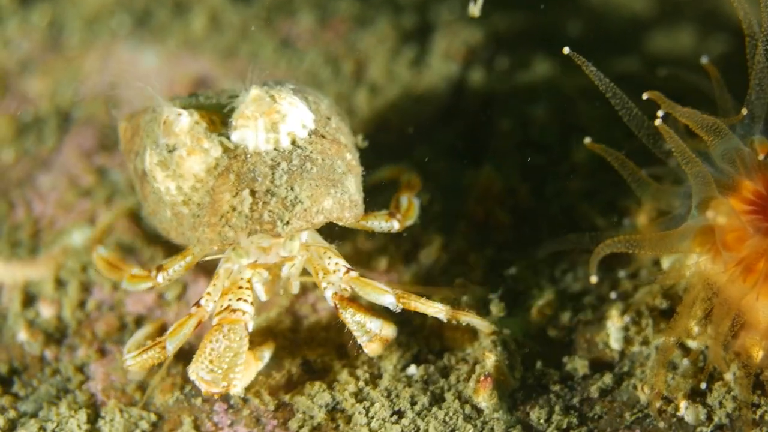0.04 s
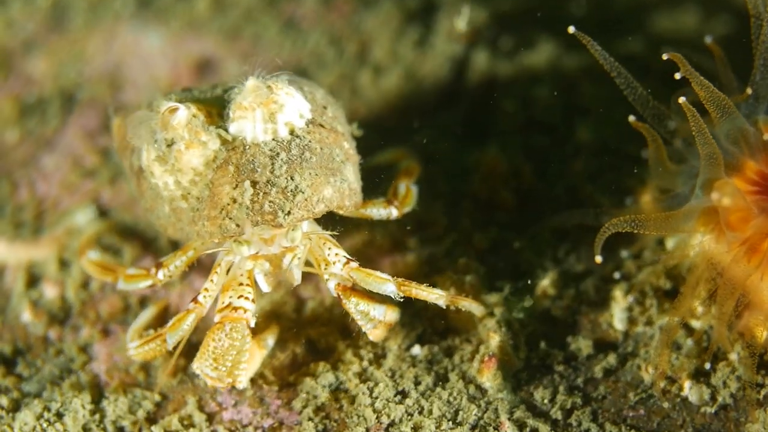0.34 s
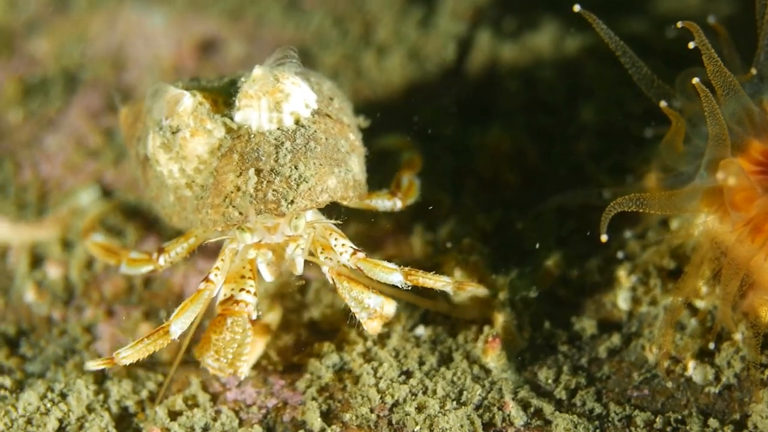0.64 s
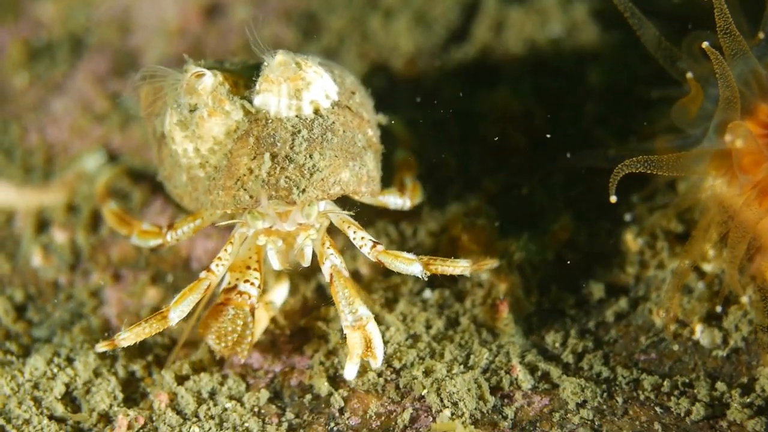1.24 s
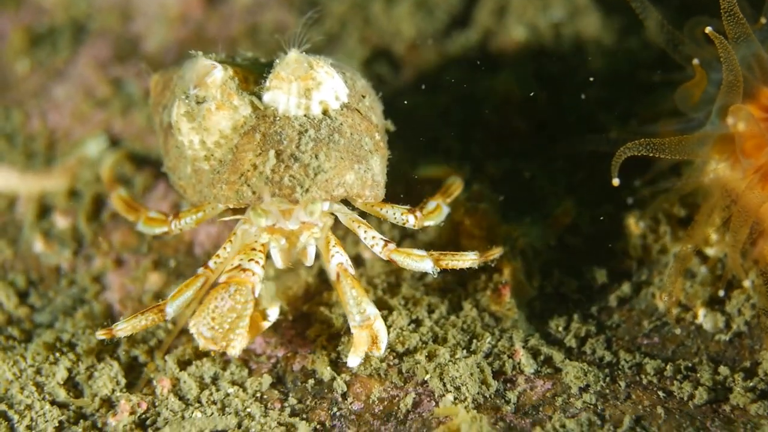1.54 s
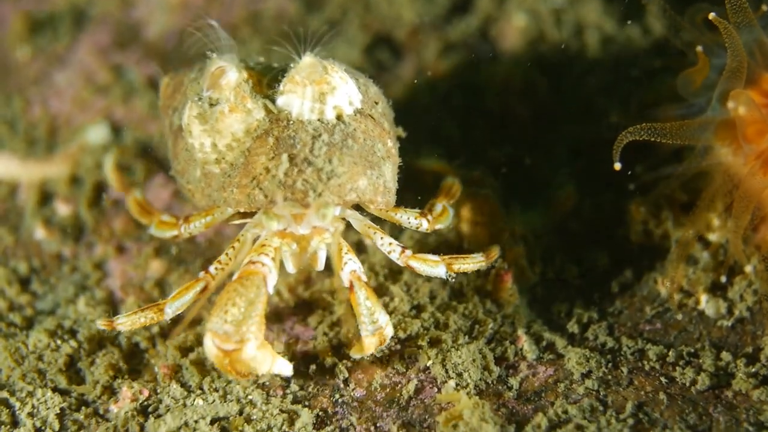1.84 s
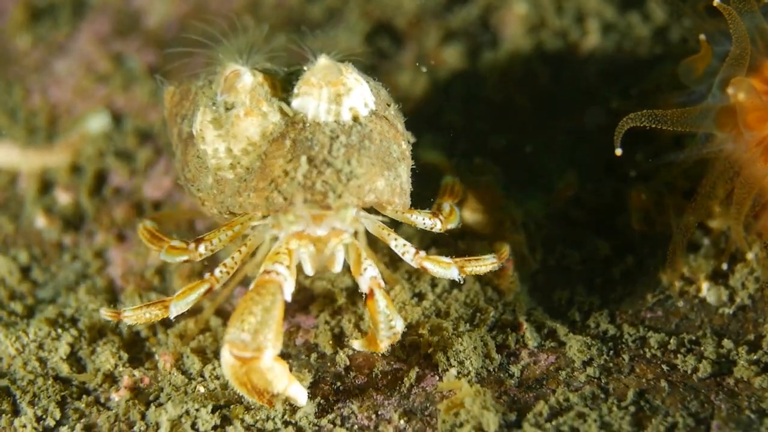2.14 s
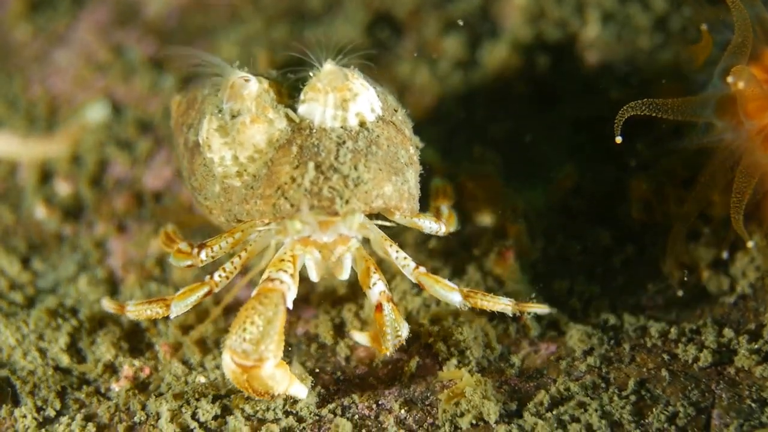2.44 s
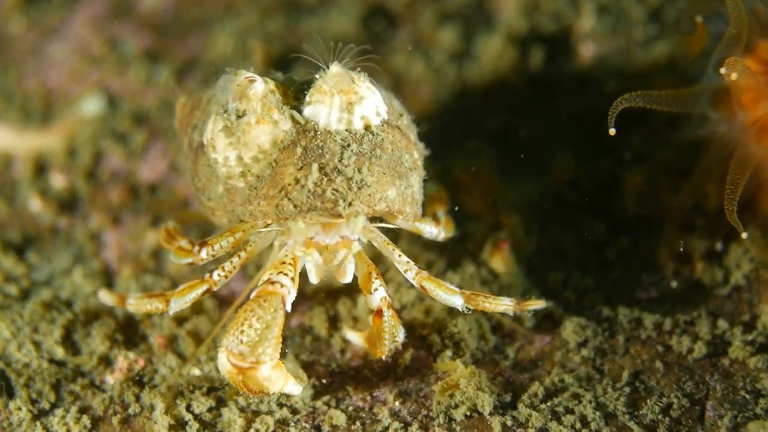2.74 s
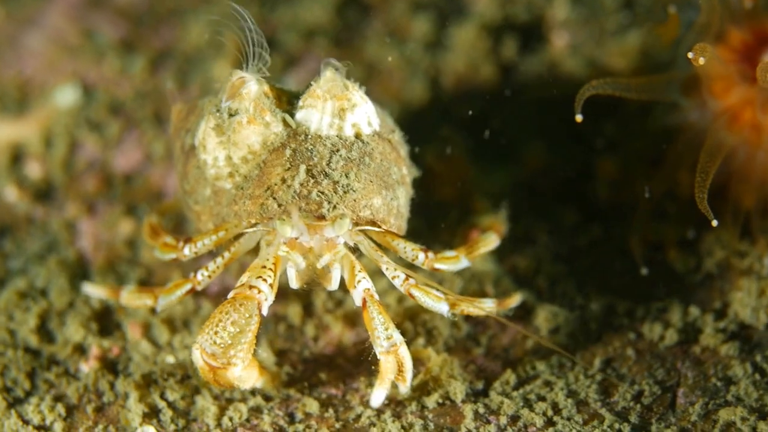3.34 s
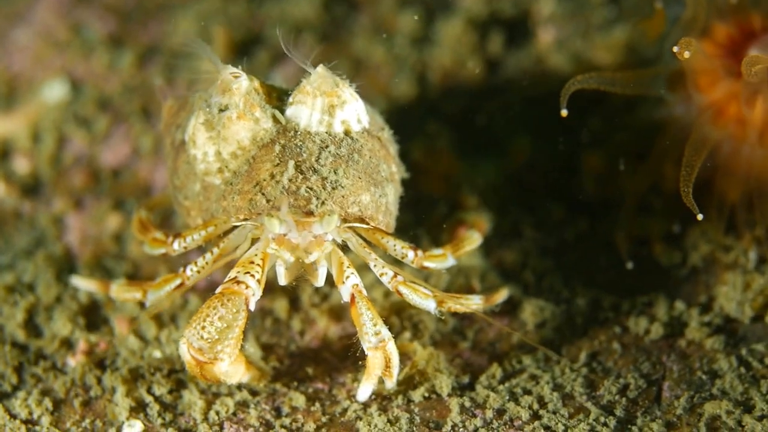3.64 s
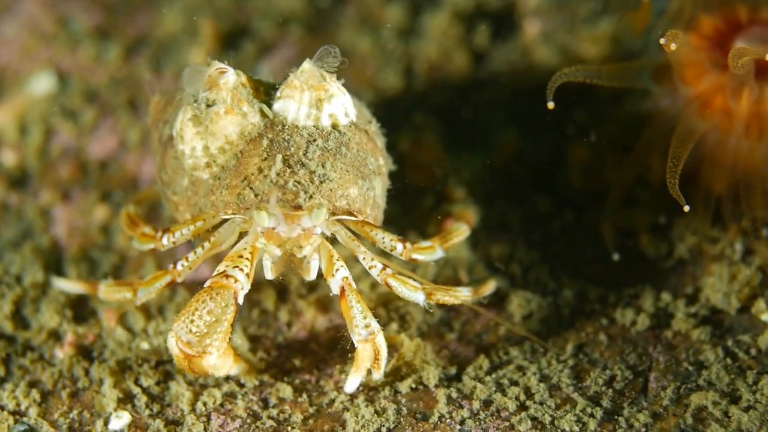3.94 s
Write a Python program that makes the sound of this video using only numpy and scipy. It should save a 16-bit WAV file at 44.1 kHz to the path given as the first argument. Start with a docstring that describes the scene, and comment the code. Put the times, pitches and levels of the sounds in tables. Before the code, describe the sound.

A small camera motor purrs and rattles inside an underwater housing, over faint hiss.

```python
"""Inside an underwater camera housing. From the start the camera hums, hisses and whistles faintly.
At 1 s a small stepping motor, probably the focus drive, starts to purr: it snaps on a 50 Hz clock,
knocks in runs on every second beat, whines and rattles through the housing; its gears tick.
At 1.44 s the housing gives one louder clunk. From 1.66 s a thin tone comes and goes.
Faint scuffs pass near 1.9 s and 3 s. The motor runs on to the end at 4 s."""
import sys
import numpy as np
from scipy import signal
from scipy.fft import rfft, irfft
from scipy.io import wavfile

SR = 44100
rng = np.random.default_rng(int(sys.argv[2]) if len(sys.argv) > 2 else 0)


def pcm_store(signal):
    """Save signal as 16-bit PCM."""
    levels = np.round(np.clip(np.atleast_2d(signal), -1, 1) * 32767)
    wavfile.write(sys.argv[1], SR, levels.astype(np.int16).T)


N = 176400

MOTOR_START_S, FIRST_BEAT_S, BEAT_S, JITTER_S = 1.009, 1.0125, .02, .00012
PAIR_S = 2 * BEAT_S

# knock runs: first_s, last_s, level_db
KNOCK_RUNS = [(1.0736, 1.155, -42), (1.2315, 1.272, -41.5), (1.3124, 1.394, -41.5), (1.5526, 1.592, -37),
              (1.6166, 1.653, -49), (1.6718, 1.792, -38), (1.914, 1.953, -44), (2.0708, 2.112, -38.5),
              (2.1919, 2.592, -37.5), (2.7112, 2.793, -44), (2.8106, 2.852, -37.5), (2.975, 3.053, -43),
              (3.0714, 3.112, -39.5), (3.1947, 3.355, -40.5), (3.4742, 3.795, -39), (3.5364, 3.775, -41)]
# stray knocks as the drive hunts: start_s, level_db
STRAY_KNOCKS = [(1.0328, -41), (1.1695, -44), (1.2124, -41), (1.4747, -41.5), (1.532, -43), (1.831, -43.5),
                (1.9319, -37), (1.995, -38.5), (2.0091, -40.5), (2.1332, -42.5), (2.5736, -42.5),
                (2.631, -41.5), (2.6581, -45.5), (2.7324, -36.5), (2.8905, -44.5), (2.992, -38),
                (3.3684, -42.5), (3.8536, -42), (3.875, -37), (3.8894, -42), (3.9512, -42), (3.9922, -37.5)]
# gear contacts in each beat pair: offset_s, level_db
GEAR_CONTACTS = [(.0012, -55.5), (.009, -63), (0.0173, -60), (0.0282, -59.5), (.0372, -58.5)]
# housing modes: pitch_hz, width_hz, knock_gain_db, rattle_gain_db, pan_db, right_lead_rad
HOUSING_MODES = [(244, 46.6, -22, -8.5, -0.5, 0), (314.6, 61.5, -13, -7, -1.5, -0.5),
                 (365.5, 96, -2, 1, -2.5, 0), (499.2, 66, -21.5, -5, -3.5, -0.5),
                 (580, 78, -42, -3.5, -1.5, 0.65), (812.7, 56, -21.5, -7.5, 9.5, 1),
                 (942.6, 96, -8, 0, -0.5, 1.5), (1540, 60, -32, -23, 4, -2),
                 (1374, 145, -19, -12, -2.5, 1.5), (1610, 24, -38, -26.5, 5.5, -1.7),
                 (1759, 68, -31, -15.5, -2, -1.5), (2004, 333, -22.5, -14.5, 0.5, -1.5),
                 (2290, 87, -35.5, -20.5, 5, 3.3), (2574, 100, -50, -23.5, 1.5, 2.5)]
# whine envelope: time_s, level_db
WHINE_ENVELOPE = [(1.02, -49.5), (1.16, -47.5), (1.22, -60), (1.275, -46.5), (1.3, -59.5), (1.4, -49.5),
                  (1.52, -56.5), (1.57, -48.5), (1.73, -54), (1.81, -47), (1.89, -61.5), (1.94, -50),
                  (2.05, -59.5), (2.11, -48.5), (2.16, -53), (2.4, -56.5), (2.46, -46.5), (2.56, -54),
                  (2.62, -46.5), (2.7, -60), (2.74, -51.5), (2.88, -50), (2.96, -56.5), (3.0, -49),
                  (3.04, -58.5), (3.07, -49), (3.16, -47), (3.23, -52.5), (3.365, -49), (3.39, -76),
                  (3.48, -47.5), (3.55, -52), (3.84, -53.5), (4.0, -53)]
# clunk modes: pitch_hz, width_hz, level_db, pan_db
CLUNK_MODES = [(200, 90, -49.5, -1), (375, 59, -43.5, -2.5), (570, 105, -39.5, -3), (827, 63, -36, 12.5)]
# gear ticks: start_s, level_db
GEAR_TICKS = [(1.147, -66), (1.194, -60), (1.235, -64.5), (1.335, -66), (1.595, -65), (1.802, -67),
              (1.832, -64), (2.083, -66.5), (2.115, -61.5), (2.606, -66), (2.632, -66.5), (2.661, -66),
              (2.925, -67), (2.955, -65), (3.077, -64.5), (3.112, -63.5), (3.964, -60.5)]
# tick modes: pitch_hz, width_hz, gain_db, pan_db
TICK_MODES = [(2080, 290, 4, 0), (2295, 103, -3.5, 13), (2616, 73, -4.5, 12)]
# thin tone spans: start_s, stop_s
THIN_SPANS = [(1.66, 1.88), (2.2, 2.67), (2.76, 2.94), (3.02, 3.36), (3.5, 3.86)]
# scuffs: peak_s, level_db
SCUFFS = [(1.912, -65), (2.978, -69.5)]
# scuff spectrum: freq_hz, gain_db
SCUFF_SPECTRUM = [(3000, -30), (5200, -6), (6500, 9), (7500, -11), (11000, 2.5), (15500, -14)]
# camera hum: pitch_hz, level_db
HUM = [(50, -87), (100, -86.5), (150, -76.5), (250, -79.5), (350, -76), (450, -78.5), (550, -81.5)]
# camera whistles: pitch_hz, level_db, pan_db, right_lead_rad
WHISTLES = [(7800, -85, -15, 3), (15600, -81, -8, 0), (15650, -84, -6, 0)]
# housing resonances stirred by the camera: pitch_hz, width_hz, level_db, pan_db, right_lead_rad
DRONES = [(368, 74, -76, -4, 0.16), (814, 77, -70, 10.5, -1.6), (996, 60, -75.5, -1, 1.7),
          (2280, 160, -86.5, 0.5, 1), (2599, 110, -86.5, -2, 1)]
# rumble spectrum: freq_hz, gain_db
RUMBLE_SPECTRUM = [(20, -17), (100, -4.5), (330, -6.5), (600, -7.5), (900, -11.5), (1250, -10.5),
                   (1900, -13), (2800, -23.5), (4000, -33)]
# hiss spectrum: freq_hz, gain_db
HISS_SPECTRUM = [(1800, -27), (2800, 0.5), (3400, -0.5), (4500, -4.5), (5150, -4.5), (5470, 0.5),
                 (5970, -3), (6470, 0.5), (7050, -3), (8150, -3.5), (8620, 3), (9340, -1.5), (11100, 2),
                 (12200, -3.5), (15400, -4.5)]
# hiss swell: time_s, gain_db
HISS_SWELL = [(0, -0.06), (2.9, 2.5), (3.7, 1.3)]
# left-right likeness of the noise: freq_hz, correlation
NOISE_CORRELATION = [(60, 0.45), (130, 0.84), (350, 0.14), (700, 0), (1400, -.5), (3200, -0.55), (5000, .3),
                     (9000, 0.47), (15000, 0.62)]
# noise balance: freq_hz, pan_db
NOISE_PAN = [(60, -1), (380, 2), (700, -6.5), (1300, -0.5), (2400, 0.5), (8000, -0.5), (15000, -0.5)]


def drive(t, rattles_per_s=300, rattle_db=-60.5, follow_db_per_db=0.1, low_cut_hz=198):
    """Knocks, gear chatter and loose rattle ring the housing; all but the knocks ease with the whine."""
    knock_force = knocks()
    loose_hits = (rng.random(N) < rattles_per_s / SR) * (t > MOTOR_START_S)
    rattle = loose_hits * rng.standard_normal(N) * from_db(rattle_db)
    whine_db = at_time(WHINE_ENVELOPE, t)
    effort = from_db(follow_db_per_db * np.minimum(whine_db - np.median(whine_db), 0))
    light_force = effort * (chatter() + rattle)
    housing = 0
    for hz, width_hz, knock_gain_db, rattle_gain_db, pan_db, lead_rad in HOUSING_MODES:
        force = from_db(knock_gain_db) * knock_force + from_db(rattle_gain_db) * light_force
        housing += place(ring(force, hz, width_hz), hz, pan_db, lead_rad)
    low_cut = signal.butter(3, low_cut_hz, "high", fs=SR, output="sos")
    return signal.sosfilt(low_cut, housing) + effort * snaps()


def knocks(rebound_s=0.014, rebound_db=-9.5):
    """Hard steps, in runs or alone; a soft rebound follows each as the drive settles."""
    runs = [(first_s + PAIR_S * k, level_db) for first_s, last_s, level_db in KNOCK_RUNS
            for k in range(round((last_s - first_s) / PAIR_S) + 1)]
    start_s, level_db = np.transpose(runs + STRAY_KNOCKS)
    return clicks(start_s, level_db) + clicks(start_s + rebound_s, level_db + rebound_db)


def chatter():
    """The same gear contacts come round in every beat pair."""
    pairs_s = np.arange(FIRST_BEAT_S, N / SR, PAIR_S)
    return sum(clicks(pairs_s + offset_s + JITTER_S * rng.standard_normal(len(pairs_s)), level_db)
               for offset_s, level_db in GEAR_CONTACTS)


def snaps(delay_s=0.002203, force_db=-38, spread_db=0.5, band_hz=(1350, 2746)):
    """A dry, bright click just after every beat."""
    start_s = np.arange(FIRST_BEAT_S + delay_s, N / SR, BEAT_S)
    late, strength = rng.standard_normal((len(start_s), 2)).T
    force = clicks(start_s + JITTER_S * late, force_db + spread_db * strength)
    body = signal.sosfilt(signal.butter(4, band_hz, "band", fs=SR, output="sos"), force)
    return place(body, np.mean(band_hz), pan_db=0, lead_rad=0.64)


def whine(t, step_hz=973.8, sag_hz=82.3, rate_spread=0.011, spread_db=2, gain_db=1.5):
    """Stepping tone: restarts on every second beat, then sags in pitch."""
    ramp_s, fade_db_per_s = 0.0029, 3
    short_move_s, full_move_db, rest_db_per_db = 0.027, -49.5, 1.25
    dip_db, dip_s = -6.5, 0.0106
    pair, age_s = np.divmod(t - FIRST_BEAT_S, PAIR_S)
    rate, strength = rng.standard_normal((int(N / SR / BEAT_S), 2))[pair.astype(int)].T
    cycles = step_hz * (1 + rate_spread * rate) * age_s + sag_hz / 2 * age_s * (1 - age_s / PAIR_S)
    envelope_db = at_time(WHINE_ENVELOPE, t)
    level_db = envelope_db + gain_db + spread_db * np.tanh(strength) - fade_db_per_s * age_s
    # quiet moves are short: they rest before the restart
    resting = (1 + np.tanh((age_s - short_move_s) / ramp_s)) / 2
    level_db -= rest_db_per_db * np.maximum(full_move_db - envelope_db, 0) * resting
    to_beat_s = BEAT_S - age_s % BEAT_S
    level_db += dip_db * np.exp(-(to_beat_s / dip_s) ** 2)
    gate = np.tanh(age_s / ramp_s) * np.tanh((PAIR_S - age_s) / ramp_s) * (t > MOTOR_START_S)
    tone = np.sqrt(2) * from_db(level_db) * gate * np.sin(2 * np.pi * cycles)
    return place(resonate(tone, step_hz, width_hz=660), step_hz, pan_db=-4, lead_rad=0.46)


def clunk(start_s=1.4425):
    """One louder bump on the housing."""
    return strike(clicks([start_s], [0]), CLUNK_MODES)


def ticks():
    """The gears catch now and then and ring brightly."""
    return strike(clicks(*np.transpose(GEAR_TICKS)), TICK_MODES)


def thin_tone(t, fade_s=0.046):
    """A thin tone that comes and goes."""
    gate = sum(np.clip(np.minimum(t - start_s, stop_s - t) / fade_s, 0, 1)
               for start_s, stop_s in THIN_SPANS)
    return gate * steady_tone(t, hz=1227, level_db=-69)


def scuffs(t, sigma_s=0.007):
    """Two brief, bright brushes of noise."""
    envelope = sum(from_db(db) * np.exp(-.5 * ((t - peak_s) / sigma_s) ** 2) for peak_s, db in SCUFFS)
    return envelope * noise(SCUFF_SPECTRUM)


def camera(t, hiss_db=-69.5, rumble_db=-67):
    """Running camera: hum, whistles, droning housing, gently swelling hiss, rumble."""
    tones = sum(steady_tone(t, *row) for row in HUM + WHISTLES)
    drones = 0
    for hz, width_hz, level_db, pan_db, lead_rad in DRONES:
        band = unit_rms(resonate(rng.standard_normal(N), hz, width_hz))
        drones += place(from_db(level_db) * band, hz, pan_db, lead_rad)
    hiss = from_db(hiss_db + at_time(HISS_SWELL, t)) * noise(HISS_SPECTRUM)
    rumble = from_db(rumble_db) * noise(RUMBLE_SPECTRUM)
    return tones + drones + rumble + hiss


def steady_tone(t, hz, level_db, pan_db=0, lead_rad=0):
    """Stereo sine, random phase."""
    side = np.array([[1], [-1]])
    phase_rad = 2 * np.pi * (hz * t + rng.random()) - side * lead_rad / 2
    return np.sqrt(2) * from_db(level_db + side * pan_db / 2) * np.sin(phase_rad)


def noise(spectrum):
    """Coloured stereo noise, unit rms."""
    hz = np.arange(N // 2 + 1) * SR / N
    common, opposed = rfft(rng.standard_normal((2, N)))
    side = np.array([[1], [-1]])
    correlation = at_hz(NOISE_CORRELATION, hz)
    white = np.sqrt(1 + correlation) * common + side * np.sqrt(1 - correlation) * opposed
    gain_db = at_hz(spectrum, hz) + side * at_hz(NOISE_PAN, hz) / 2
    return unit_rms(irfft(white * from_db(gain_db), N))


def clicks(start_s, level_db):
    """Impulse train."""
    force = np.zeros(N + SR)
    np.add.at(force, (np.asarray(start_s) * SR).astype(int), from_db(level_db))
    return force[:N] + 1e-18


def strike(force, modes):
    """Ring a table of modes."""
    return sum(place(from_db(db) * ring(force, hz, width_hz), hz, pan_db, 0)
               for hz, width_hz, db, pan_db in modes)


def ring(force, hz, width_hz):
    """One mode: a unit click swells to about 1 and dies away."""
    return resonate(force, hz, width_hz) * np.e * SR / (2 * np.pi * width_hz)


def resonate(x, hz, width_hz):
    """Two equal resonators in series, unity peak gain."""
    radius = np.exp(-np.pi * width_hz / SR)
    gain = (1 - radius ** 2) / 2
    section = [gain, 0, -gain, 1, -2 * radius * np.cos(2 * np.pi * hz / SR), radius ** 2]
    return signal.sosfilt([section] * 2, x)


def place(x, hz, pan_db, lead_rad):
    """Narrow-band sound at two microphones: left louder by pan_db, right ahead by lead_rad."""
    n = np.arange(N)
    shift_samples = lead_rad / (4 * np.pi * hz) * SR
    return np.array([from_db(side * pan_db / 2) * np.interp(n - side * shift_samples, n, x)
                     for side in (1, -1)])


def at_time(points, t):
    return np.interp(t, *np.transpose(points))


def at_hz(points, hz):
    """Interpolate on a log-frequency axis."""
    points_hz, values = np.transpose(points)
    return np.interp(np.log(hz + 1e-3), np.log(points_hz), values)


def from_db(db):
    return 10 ** (np.asarray(db) / 20)


def unit_rms(x):
    return x / np.sqrt(np.mean(x ** 2) + 1e-20)


def scene():
    """Stereo sum inside the housing."""
    t = np.arange(N) / SR
    return drive(t) + whine(t) + thin_tone(t) + ticks() + clunk() + scuffs(t) + camera(t)


def record(dry):
    """Steep low-pass."""
    cutoff_hz = 15750
    return signal.sosfilt(signal.ellip(12, .1, 80, cutoff_hz, fs=SR, output="sos"), dry)


dry = scene()
out = record(dry)
pcm_store(out)
```